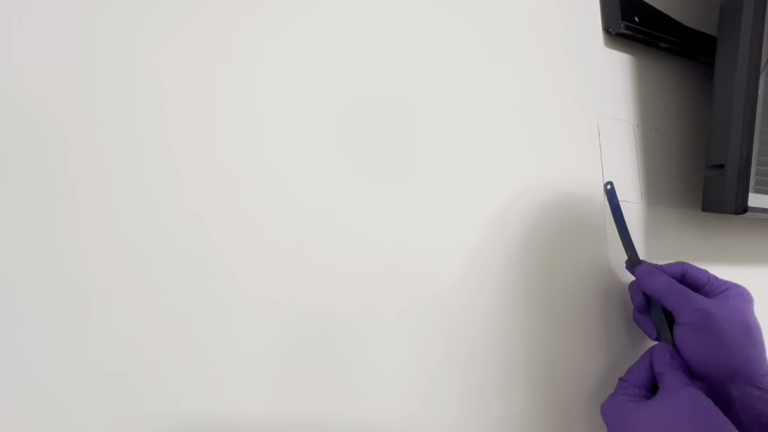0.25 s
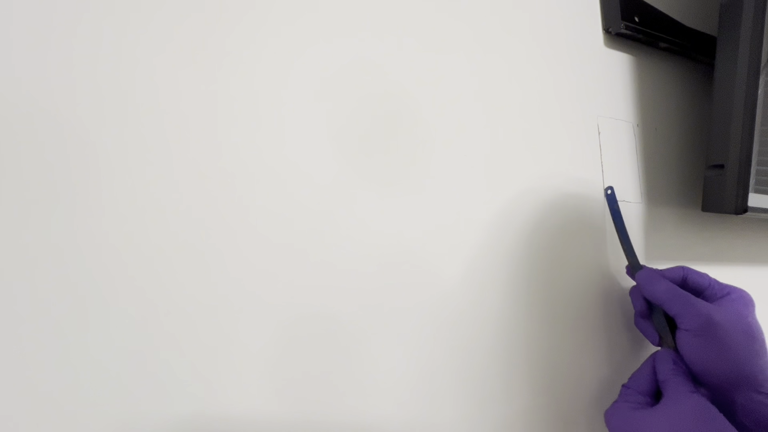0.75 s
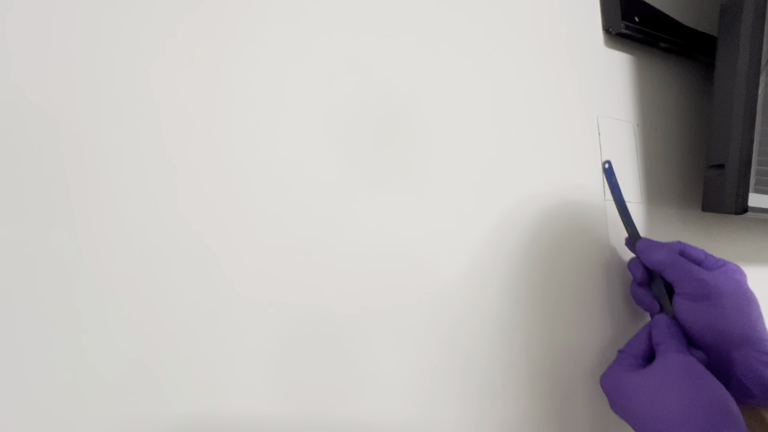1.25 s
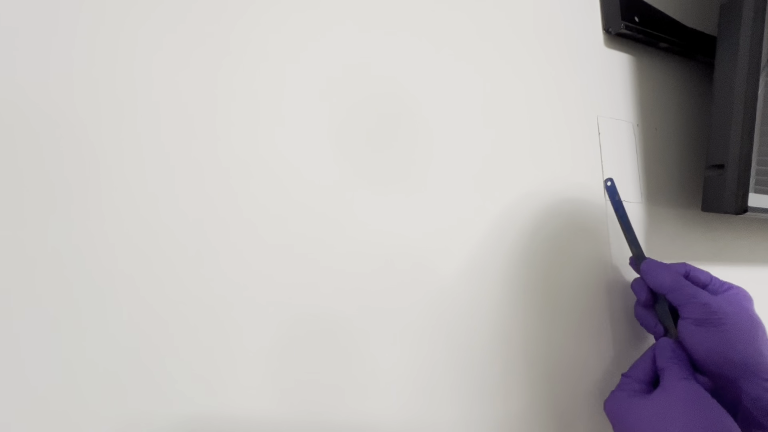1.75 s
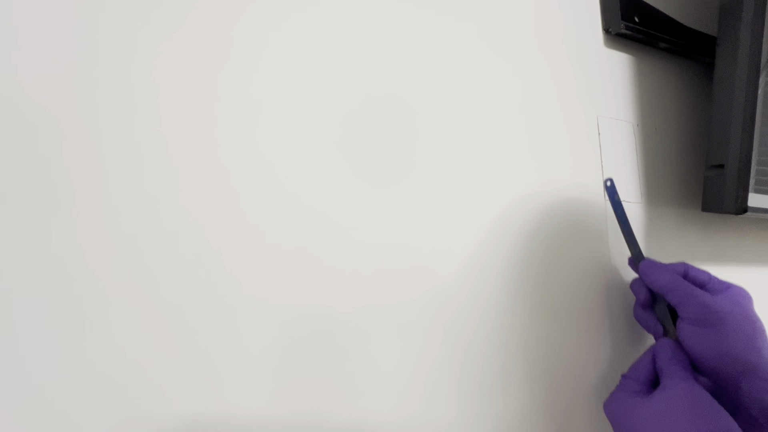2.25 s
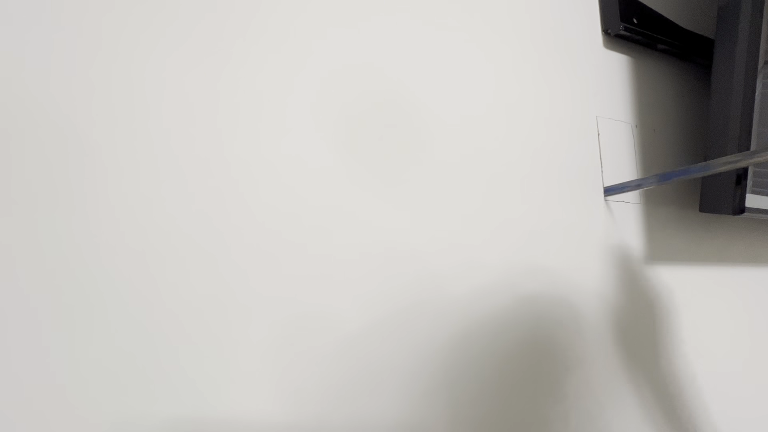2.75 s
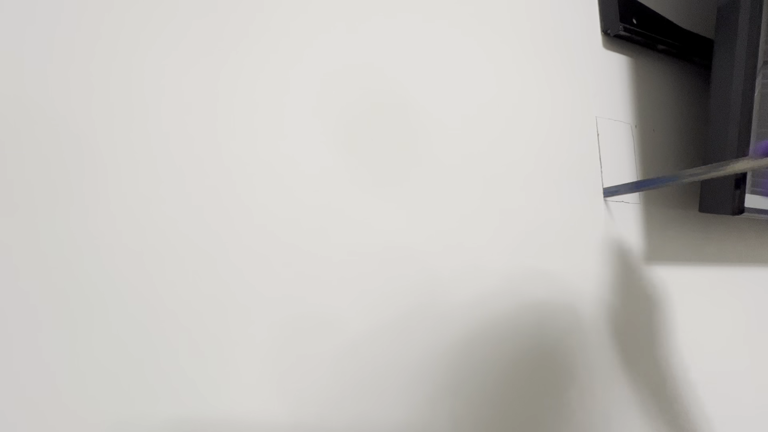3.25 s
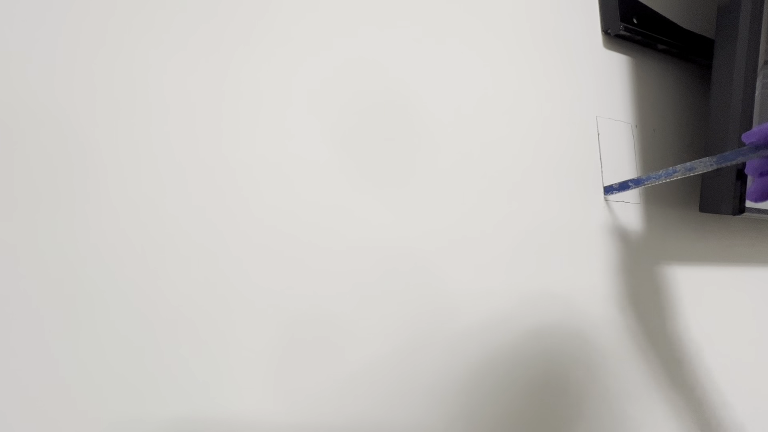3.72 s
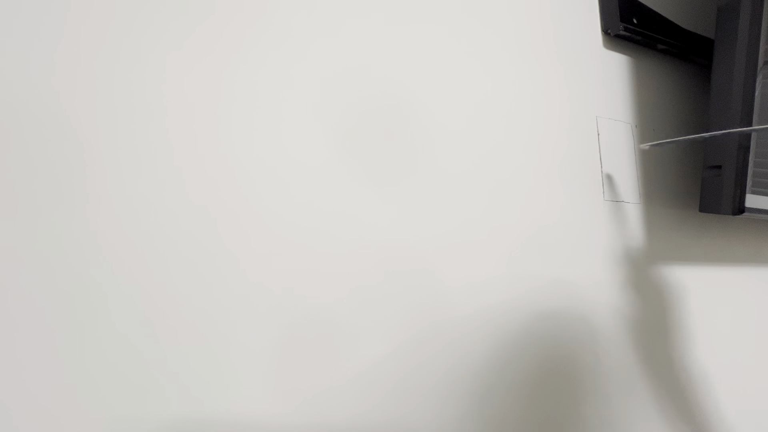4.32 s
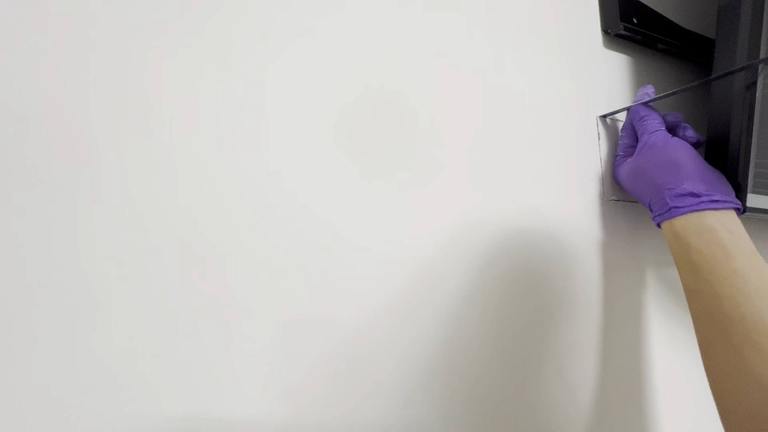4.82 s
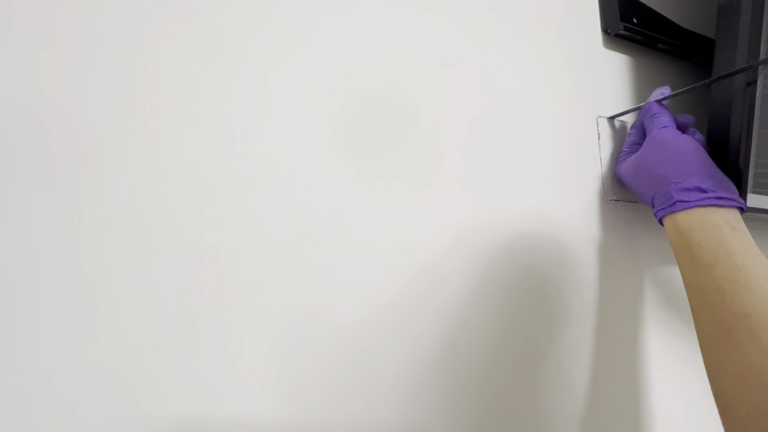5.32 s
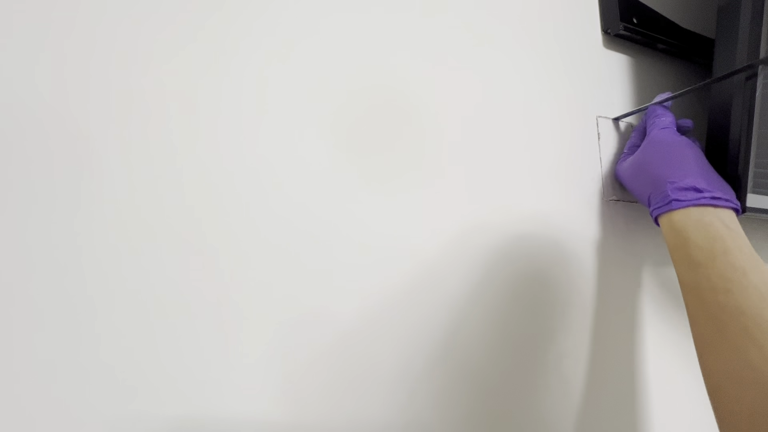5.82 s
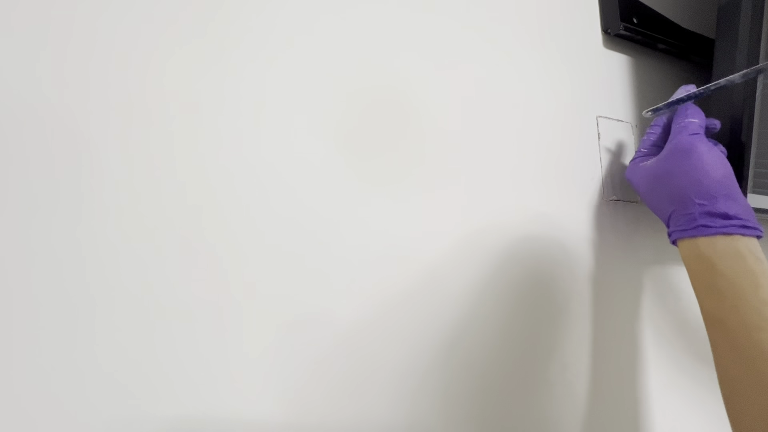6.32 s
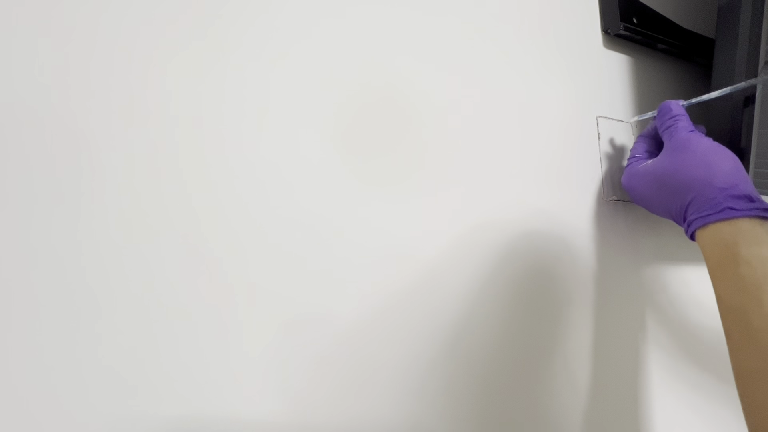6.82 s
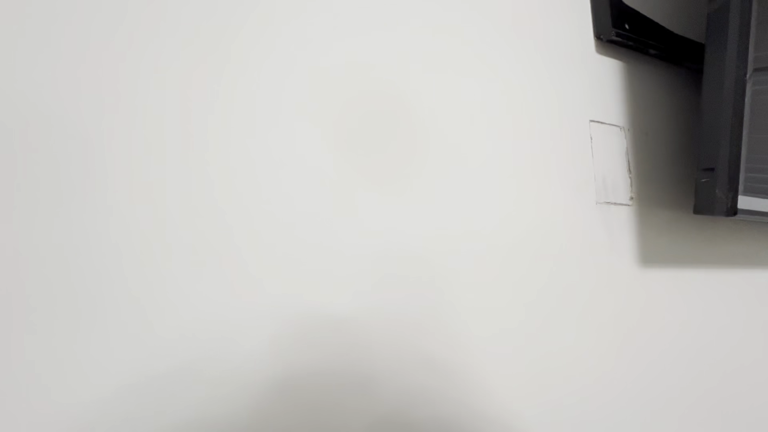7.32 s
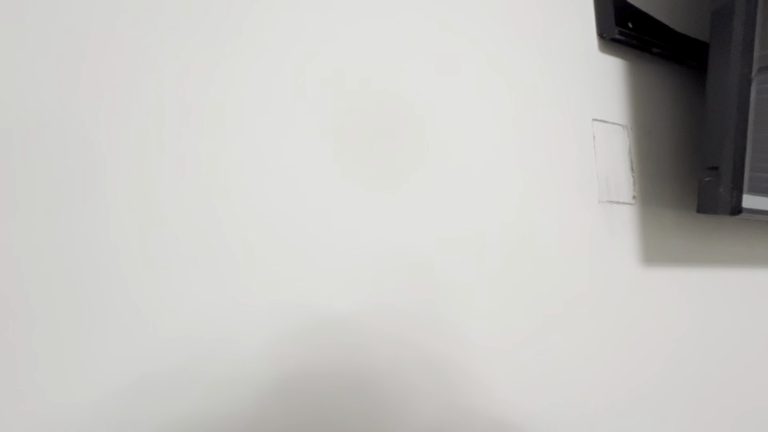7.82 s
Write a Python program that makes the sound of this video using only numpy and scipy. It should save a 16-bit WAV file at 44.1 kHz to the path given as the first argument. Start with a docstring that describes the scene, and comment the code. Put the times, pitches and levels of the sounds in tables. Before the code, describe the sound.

A thin saw rasps through hollow plasterboard, quiet, then harsh and quick, then muffled, before something snaps loudly and crumbs tick down.

```python
"""Sawing an opening in plasterboard

A thin hand-held saw blade works close to a two-port microphone, in five stretches of different tone.
Teeth crumble the gypsum (noisy impulses) and shake the hollow panel (resonances); fast strokes sing at the tooth rate.
At the end something snaps (a falling chirp) and knocks (ringing tones) near the left port, slides, and crumbs
tick down (short noise bursts). A steady hiss (coloured noise) sits mostly on the left."""
import sys
import numpy as np
from scipy import signal
from scipy.fft import rfft, irfft, next_fast_len
from scipy.io import wavfile
from scipy.ndimage import uniform_filter1d, map_coordinates

SR = 44100
rng = np.random.default_rng(int(sys.argv[2]) if len(sys.argv) > 2 else 0)


def digitize_waveform(pressure):
    """Quantize a signal to 16-bit integers and store it at the path in sys.argv[1].

    Rows of a 2-D input are taken as channels; values are limited to [-1, 1].
    """
    field = np.atleast_2d(pressure).T
    bounded = np.clip(field, -1, 1)
    quanta = np.round(bounded * 32767).astype(np.int16)
    wavfile.write(sys.argv[1], SR, quanta)


def volts(x):
    """Linear amplitude factor 10**(x/20) for a level x in dB, scalar or array-like."""
    e = np.asarray(x, float) / 20
    return 10 ** e


N = 355887


def unit(x):
    """Scales a signal to an rms of 1."""
    return x / np.sqrt(np.mean(x ** 2) + 1e-20)


def along(points, hz):
    """Reads a curve of (Hz, value) points, with straight lines on a log frequency axis."""
    point_hz, value = np.transpose(points)
    return np.interp(np.log(hz + 1), np.log(point_hz + 1), value)


def filtered(x, response):
    """Multiplies the spectrum of x by a complex response of frequency."""
    m = next_fast_len(x.shape[-1] + 8192)
    spectrum = rfft(x, m) * response(np.fft.rfftfreq(m, 1 / SR))
    return irfft(spectrum, m)[..., :x.shape[-1]]


def peaks(hz, table):
    """A flat response with resonances standing on it; each row: centre in Hz, width in Hz, height in dB."""
    response = 1
    for centre, width, db in table:
        ringing = 1j * hz * width / (centre * centre - hz * hz + 1j * hz * width)
        response = response + (volts(db) - 1) * ringing
    return response


def left_right(pan_db):
    """Splits a left-minus-right difference in dB evenly over the two ports."""
    return np.array([[pan_db], [-pan_db]]) / 2


def hiss():
    """Steady coloured noise, mostly on the left, with a low building hum made of narrow, wavering noise bands."""
    # Background noise, one list for the left port and one for the right.
    # Each row: frequency in Hz, level in dB per Hz before the hum is added.
    noise_colour = [
        [(30, -83.5), (120, -82.5), (300, -97.5), (450, -90.5), (650, -103), (1100, -99.0), (1500, -89.5),
         (2050, -84), (2800, -94.5), (4000, -106.0), (6700, -96.5), (8500, -108.0), (9800, -117.0),
         (16000, -139.0)],
        [(30, -91), (120, -100.0), (300, -106.0), (450, -102.0), (650, -104.0), (1100, -103.0), (1500, -101.0),
         (2050, -110.0), (2800, -116.0), (4000, -119.0), (6700, -115.0), (8500, -119.0), (9800, -123.0),
         (16000, -139.0)],
    ]
    # Low hum. Each row: frequency in Hz, width in Hz, height over the hiss in dB.
    hum = [(61.4, 8, 7), (133, 8.26, 1)]

    def density(hz):
        """Gain that gives white noise of rms 1 the wanted level per Hz."""
        colour = np.array([volts(along(port, hz)) for port in noise_colour])
        return colour * np.sqrt(SR / 2) * peaks(hz, hum)
    return filtered(rng.standard_normal((2, N)), density)


def ticks():
    """Crumbs landing: tiny bright noise bursts that die in a few milliseconds."""
    # Crumbs and small ticks. Each row: start in seconds, level in dB before colouring, left minus right in dB.
    crumbs = [(4.1114, -52, -2), (4.1278, -34, -14), (4.1414, -42, 2), (7.2654, -50, 0), (7.4334, -44, 4),
              (7.8894, -45, -13), (7.9044, -42.5, -6), (7.9469, -56, 3.0), (7.9693, -45, -8),
              (7.9863, -42, -13), (7.9994, -51, -4), (8.0124, -50, -6)]
    # Colour of a tick. Each row: frequency in Hz, gain in dB.
    tick_colour = [(1200, -21), (3000, -3.5), (6500, -0.5), (10000, -16.5), (16000, -31)]
    out, t = np.zeros((2, N + SR)), np.arange(SR // 50) / SR
    bursts = rng.standard_normal((len(crumbs), len(t))) * volts(-60 * t / 0.004)  # 60 dB down in 4 ms
    for (start, db, pan_db), burst in zip(crumbs, bursts):
        out[:, round(start * SR):][:, :len(t)] += volts(db + left_right(pan_db)) * burst
    return filtered(out[:, :N], lambda hz: volts(along(tick_colour, hz)))


def snap():
    """A bending wave: its highs outrun its lows, so the crack is a falling chirp, after a short one-sided step."""
    # The snap, one row for the left port and one for the right. Each row: start in seconds, peak in dB,
    # spread in seconds times root Hz, lag of the lows in cycles, echo delay in seconds, echo level in dB.
    arrivals = [(7.217, 0.5, 0.0477, 0.6215, 0.0023, -20), (7.2168, -1, 0.013, 1.2, .0024, -20)]
    # Colour of the snap at the left port. Each row: frequency in Hz, relative level in dB.
    left_colour = [(30, -1.5), (70, 15), (250, 17), (500, -8), (1000, 5.5), (2000, -9.5), (3500, -3),
                   (5200, 0), (7000, -10), (11000, -36), (16000, -52)]
    # Colour of the snap at the right port. Each row: frequency in Hz, relative level in dB.
    right_colour = [(30, -1.5), (60, 12.5), (200, 12), (500, -6), (1100, 7), (2200, -16), (4000, -36),
                    (8000, -21), (11000, -33), (16000, -42)]
    # A short step with noise on it; the snap is silent before the step starts.
    # One row: start in seconds, end in seconds, left level in dB, right level in dB.
    lead_in = (7.2128, 7.2172, -19, -34)
    cracks, pulse = [], np.zeros(N)
    pulse[0] = 1
    for (at, db, spread, cycles, echo_s, echo_db), colour in zip(arrivals, (left_colour, right_colour)):
        def path(hz):
            """Colour, growing delay towards the lows, and one echo."""
            turns = hz * at + 2 * spread * np.sqrt(hz) + cycles * np.log(hz + 20)
            echo = 1 + volts(echo_db) * np.exp(-2j * np.pi * hz * echo_s)
            return volts(along(colour, hz)) * np.exp(-2j * np.pi * turns) * echo
        crack = filtered(pulse, path)
        cracks.append(volts(db) * crack / np.abs(crack).max())
    start, end, *step_db = lead_in
    t = np.arange(N) / SR
    ripple = uniform_filter1d(rng.standard_normal((2, N)), size=16, axis=1)
    step = ((t > start) & (t < end)) * (1 + 0.5 * ripple)
    return np.array(cracks) * (t > start) + volts(np.array(step_db))[:, None] * step


def knocks():
    """Each blow rings the panel's low tones at new strengths; harder blows favour the higher tones."""
    # Blows on the panel. Each row: start in seconds, level in dB before a common cut,
    # left minus right in dB, hardness in dB per octave above 200 Hz.
    blows = [(1.13, -39, 8.0, 4), (2.453, -20, 6, 12), (3.584, -19, 6, 0), (3.791, -22, -7, 13),
             (4.459, -32, 11, 4), (5.754, -25.5, -4, 17), (5.876, -12.5, -3, 9), (7.233, -5.5, 15.5, 2.5),
             (7.331, -20, 2, -4), (7.376, -13, -8, -10), (7.381, -13, 20, -2), (7.392, -7, 21, 2.5)]
    # Low panel tones. Each row: frequency in Hz, level in dB, time to fall 60 dB in seconds.
    tones = [(54, -16, 0.1), (137, -3, 0.025), (190.7, -8.5, 0.13), (245, -5, 0.067), (304, -5, 0.071),
             (475, -26, 0.053)]
    out, t = np.zeros((2, N + SR)), np.arange(SR // 3) / SR
    luck_db = rng.normal(0, 0.48, (len(blows), len(tones)))
    for (start, db, pan_db, hard_db), luck_row in zip(blows, luck_db):
        ring = np.zeros(len(t))
        for (hz, tone_db, t60), luck in zip(tones, luck_row):
            level = tone_db + luck + hard_db * np.log2(hz / 200)
            ring += volts(level - 60 * t / t60) * np.sin(2 * np.pi * hz * t)
        soft_start = 1 - np.exp(-t / 0.0032)
        out[:, round(start * SR):][:, :len(t)] += volts(db - 7.5 + left_right(pan_db)) * ring * soft_start
    return out[:, :N]


def crumble(n, per_s, spread_db):
    """Gypsum breaking: random impulses of very uneven size."""
    hit = rng.random((2, n)) < per_s / SR
    size = volts(spread_db * rng.exponential(size=(2, n)))
    return unit(hit * rng.standard_normal((2, n)) * size)


def teeth(t, jitter, scatter_db):
    """One push per tooth passing the board, and its share of the force; both follow blade speed."""
    # Fast strokes. Each row: fastest moment in seconds, top rate in teeth per second,
    # top share of regular tooth pulses from 0 to 1.
    fast_strokes = [(2.575, 520, 0.1), (2.755, 445, 0.13), (2.92, 737, 0.2), (3.065, 600, 0.4),
                    (3.235, 782, 0.4), (3.385, 450, 0.1)]
    turn_hz, half_stroke_s = 278.5, 0.08  # tooth rate where the blade turns; time from turn to full speed
    fastest, top, clean = np.transpose(fast_strokes)[:, :, None]
    speed = np.cos(np.pi / 2 * np.clip((t - fastest) / half_stroke_s, -1, 1)) ** 1.5
    rate = turn_hz + ((top - turn_hz) * speed).max(0)
    slack = unit(uniform_filter1d(rng.standard_normal(len(t)), size=200))
    passed = np.floor(np.cumsum(rate) / SR + jitter * slack)
    push = (np.diff(passed, prepend=0) > 0) * volts(scatter_db * rng.standard_normal(len(t)))
    push = uniform_filter1d(push.astype(float), size=11)  # a tooth pushes softly: strong fundamental
    share = np.clip((clean * speed ** 1.6).max(0), 0, 1)
    return unit(push - uniform_filter1d(push, size=200)), share


def panel(hz, blade):
    """Panel and blade ring together."""
    # Panel and blade resonances. Each row: frequency in Hz, width in Hz, height over the broad colour in dB.
    resonances = [(78.4, 24, 6.5), (141.3, 7.5, 12), (175, 130, 6), (250.3, 19.3, 7.5), (343.4, 21, 6),
                  (456.3, 22, 7.5), (560, 3.9, 7), (630.6, 3.9, 8.5), (713, 15, 6), (769, 4.3, 6),
                  (854, 25, 7), (910, 39, 8.5), (1067, 22, 5), (1398, 58, 6), (1515, 22, -4),
                  (1647, 14, 7.5), (1778, 19.6, 2), (2247, 40, 1), (2447, 45, 6), (2697, 200, 5),
                  (3024, 14, 4)]
    return peaks(hz, resonances + blade)


def ports(pair, sides, t60):
    """Mixes two signals to partly alike left and right, the left one later, each with its own short tail."""
    # Likeness of left and right. Each row: frequency in Hz, likeness from 0 to 1.
    alike = [(60, .9), (250, .65), (1500, .75), (6000, .65), (14000, .9)]
    # Panel and room tail. Each row: frequency in Hz, level against the direct sound in dB.
    wet = [(60, -10.5), (250, 0), (600, 6.5), (1000, 2.5), (2500, 3), (9000, 11.5)]
    left_lag = 12  # samples

    def blend(hz):
        """Shares of the common and the opposed signal that give the wanted likeness."""
        turn = np.arccos(along(alike, hz)) / 2
        return np.array([np.cos(turn), np.sin(turn)])
    mid, side = filtered(pair, blend)
    tail_t = np.arange(SR // 5) / SR
    tail = rng.standard_normal((2, len(tail_t))) * volts(-60 * tail_t / t60)

    def path(hz):
        """Direct sound plus tail: fine peaks and dips, even on the broad scale."""
        tail_spectrum = rfft(tail, 2 * len(hz) - 1) / np.linalg.norm(tail[0])
        both = 1 + volts(along(wet, hz)) * tail_spectrum
        broad_power = uniform_filter1d(np.abs(both) ** 2, size=round(250 / hz[1]), axis=1)  # over 250 Hz
        lean = volts(along(sides, hz) / 2)
        left = lean * np.exp(-2j * np.pi * hz * left_lag / SR)
        return both / np.sqrt(broad_power) * np.array([left, 1 / lean])
    return filtered(np.array([mid + side, mid - side]), path)


def wobble(t):
    """A smooth random gain: random dB values 14 times a second, joined by a curve."""
    at = (t - t[0]) * 14
    return volts(3.5 * map_coordinates(rng.standard_normal(len(t) // 500 + 4), [at]))


def effort(t, manner):
    """Gains of bite, panel swing and grit: the strokes add in power over a wavering rest."""
    # Saw strokes, then the slide after the snap. Each row: bite peak in seconds, rise in seconds,
    # fall in seconds before stretching, bite level in dB, grit level in dB.
    strokes = [(.025, 0.035, 0.077, -55, -59.5), (.18, 0.076, 0.049, -51, -61.5),
               (.308, 0.095, 0.049, -57, -61.5), (.426, 0.043, 0.057, -51, -61.5),
               (.556, 0.06, .05, -55.5, -62.5), (.69, .05, 0.067, -55, -63.5), (.83, 0.043, .08, -63, -79),
               (.96, 0.033, 0.08, -50, -61.5), (1.094, 0.057, 0.068, -56.5, -63.5),
               (1.25, 0.067, 0.072, -51, -56.5), (1.37, 0.036, 0.066, -64, -64),
               (1.436, 0.039, 0.062, -56.5, -57.5), (1.56, 0.044, 0.088, -48.5, -53.5),
               (1.71, 0.083, 0.085, -53.5, -56), (1.835, 0.048, 0.096, -47, -52),
               (1.96, 0.057, 0.095, -52.5, -54), (2.125, 0.061, 0.059, -46, -54),
               (2.28, 0.084, 0.044, -53.5, -56.5), (2.384, 0.051, .1, -46.5, -54),
               (2.455, .003, 0.039, -28, -50.5), (2.564, 0.036, 0.094, -24.5, -38.5),
               (2.721, 0.052, 0.09, -27.5, -40.5), (2.899, 0.025, 0.077, -21, -32.5),
               (3.058, 0.078, 0.083, -27.5, -39), (3.228, 0.032, 0.081, -24, -34.5),
               (3.372, 0.076, 0.094, -26.5, -41), (3.593, 0.0114, 0.08, -36.5, -46),
               (3.797, 0.019, 0.062, -38.5, -49), (4.466, 0.0057, 0.066, -53.5, -54.5),
               (4.542, 0.089, 0.056, -42, -53.5), (4.65, 0.075, 0.096, -50, -54),
               (4.789, 0.067, 0.21, -44.5, -51.5), (5.17, 0.079, 0.082, -48, -51),
               (5.31, 0.081, 0.1, -42.5, -52), (5.468, 0.11, 0.054, -54.5, -60),
               (5.568, 0.053, 0.075, -47.5, -56), (5.76, 0.053, 0.052, -47.5, -53.5),
               (5.82, 0.015, .04, -48.5, -49), (5.88, .04, 0.11, -40, -45.5),
               (6.49, 0.032, 0.063, -82, -63.5), (7.384, 0.03, 0.039, -47, -57.5),
               (7.471, 0.1, 0.14, -47, -51.5), (7.545, 0.083, .04, -52, -51.5),
               (7.786, 0.012, 0.015, -67.5, -67)]
    # The panel's lows under hand and blade, between strokes. Each row: time in seconds, level in dB before wavering.
    lean = [(0, -62), (.46, -46), (.55, -54), (.8, -58), (1.15, -49), (1.3, -48.5), (1.5, -58), (2.44, -60),
            (2.46, -38.5), (2.54, -26), (2.66, -32), (2.85, -43), (3.45, -34), (3.47, -67), (3.55, -69),
            (3.75, -58), (3.9, -42.5), (4.07, -66.5), (4.45, -60), (4.47, -40), (4.7, -51), (4.91, -36.5),
            (5.1, -84), (5.62, -36.5), (5.7, -51), (5.82, -45), (6.05, -51.5), (6.18, -54), (6.22, -62.5),
            (6.44, -64), (6.62, -61), (6.8, -74), (7.2, -77.5), (7.28, -31), (7.36, -39.5), (7.396, -22),
            (7.43, -40), (7.48, -33), (7.5, -44), (7.6, -54), (7.67, -53), (7.7, -42), (7.76, -43),
            (7.82, -52), (8.07, -43.5)]
    bite_rest_db, grit_rest_db, swing_db, round_in, round_out = manner
    here = [row for row in strokes if t[0] <= row[0] <= t[-1]]
    peak_s, rise, fall, bite_db, grit_db = np.transpose(here)[:, :, None]

    def swell(db, lag_s, stretch, rest):
        """One layer's gain; a stroke is 12 dB down at the ends of its rise and stretched fall."""
        dt = t - peak_s - lag_s
        rising = np.abs(dt / rise) ** round_in
        falling = np.abs(dt / fall / stretch) ** round_out
        away = np.where(dt < 0, rising, falling)
        return np.sqrt((volts(db - 12 * away) ** 2).sum(0) + (rest * wobble(t)) ** 2)
    bite = swell(bite_db, 0, 0.85, volts(bite_rest_db))
    # the panel answers late and swings on
    swing = swell(bite_db + swing_db, 0.011, 1.07, volts(np.interp(t, *np.transpose(lean))))
    grit = swell(grit_db, 0.0052, 0.73, volts(grit_rest_db))  # grit peaks after the bite
    return bite, swing, grit


def saw():
    """In each stretch the cutting force passes through the panel and is heard as swing, bite and grit."""
    # The five stretches of work. Each row: start in seconds, end in seconds.
    stretches = [(0, 2.452), (2.452, 3.457), (3.457, 4.457), (4.457, 7.213), (7.213, 8.07)]
    # Colour of the work, one list per stretch. Each row: frequency in Hz, relative level in dB.
    colours = [
        [(18, -43), (30, -5), (59, 7), (106, -5.5), (138, 3), (287, -10.5), (355, -4.5), (569, -17.5),
         (632, -15), (822, -27), (2750, -25), (4910, -35), (8740, -41.5), (16000, -118)],
        [(18, -54.5), (30, -23.5), (79, -4.5), (328, -5.5), (384, -2), (702, -10.5), (1280, -16.5),
         (1460, -15.5), (1860, -20.5), (8520, -31.5), (13700, -62.5), (16000, -59.5)],
        [(18, -44), (30, -9), (75, 3.5), (295, -6.5), (345, -5), (512, -16.5), (616, -10.5), (988, -31.5),
         (1630, -30), (3580, -41), (8520, -42), (16000, -92)],
        [(18, -39), (30, -0.5), (71, 9.5), (109, -3), (345, -4.5), (394, -13.5), (512, -16), (740, -29.5),
         (1320, -25), (4650, -37.5), (6900, -34.5), (16000, -75)],
        [(18, -29), (30, 0.5), (59, 8.5), (215, -15), (252, -8.5), (473, -23), (1720, -34.5), (4530, -52.5),
         (6720, -42), (11100, -60), (12300, -78), (16000, -67.5)],
    ]
    # Balance of the ports, one list per stretch. Each row: frequency in Hz, left minus right in dB.
    balances = [
        [(60, 9.5), (180, 2), (550, 3), (1650, 3.5), (4970, -4.5), (15000, -7.5)],
        [(60, 4.5), (180, 2.5), (550, 0), (1650, 2), (4970, -2), (15000, -3.5)],
        [(60, 5.5), (180, 7), (550, 5), (1650, 3), (4970, -3.5), (15000, -2.5)],
        [(60, 3), (180, 5), (550, 1), (1650, 3), (4970, -4), (15000, -2)],
        [(60, 9.5), (120, 23.5), (240, 16.5), (480, 17), (950, 0.5), (1890, 15.5), (3770, 12.5), (7520, 10),
         (15000, -4)],
    ]
    # The free length of blade rings differently in each stretch, one list per stretch.
    # Each row: frequency in Hz, width in Hz, height over the broad colour in dB.
    blades = [
        [(3940, 49, 7.5), (6440, 950, 8.5), (8790, 330, 15.5)],
        [(4070, 120, 3)],
        [(3840, 71, 7), (6340, 140, 8.5), (8440, 150, 12)],
        [(6700, 230, -0.5), (8900, 1300, 7.5)],
        [(970, 310, 9), (2310, 290, -19), (6750, 480, 0.5)],
    ]
    # Way of working, one row per stretch. Each row: bite between strokes in dB, grit between strokes in dB,
    # panel swing over bite in dB, roundness of the rise, roundness of the fall (both exponents).
    manners = [(-77, -76, 3.5, 2.07, 1.8), (-44.5, -59.5, -3.5, 1.6, 1.4), (-86, -77.5, 6, 1.45, 1.04),
               (-80.5, -82, 6, 1.94, 1.53), (-75.5, -70.5, 5, 0.97, 2.28)]
    # Teeth catch and tear a lump loose. Each row: time in seconds, sudden level change in dB,
    # seconds until about a third of that change is left.
    catches = [(1.521, 7.5, 0.017), (2.531, 1.5, .01), (2.552, 4.5, .011), (2.876, 2.5, 0.0096),
               (3.199, 3.5, .009), (3.217, 4.5, 0.0075), (3.59, 4, 0.0072), (3.791, 2.5, 0.019),
               (4.458, -2.5, 0.017), (5.54, 7, 0.0056), (5.859, 3, 0.012), (5.877, 6.5, .015)]
    out = np.zeros((2, N))
    for (start, end), colour, sides, blade, manner in zip(stretches, colours, balances, blades, manners):
        a, b = round(start * SR), min(round(end * SR), N)
        t = np.arange(a, b) / SR
        push, share = teeth(t, jitter=0.1, scatter_db=4)
        crumbling = np.sqrt(1 - share) * crumble(b - a, per_s=5000, spread_db=2)
        force = crumbling + np.sqrt(share) * push * [[1.3], [0.4]]
        board = filtered(force, lambda hz: volts(along(colour, hz)) * panel(hz, blade))

        # blade and hand move, so the path to the ports keeps changing
        drift = 2 * np.pi * 1.1 * t
        heard = np.abs(np.cos(drift)) * ports(board, sides, t60=0.06)
        heard += np.abs(np.sin(drift)) * ports(board, sides, t60=0.084)

        def split(hz):
            """Middle, low and high bands, for bite, swing and grit."""
            low = 1 / (1 + (hz / 450) ** 6)
            high = 1 - 1 / (1 + (hz / 1500) ** 6)
            return np.array([1 - low - high, low, high])[:, None]
        parts = filtered(heard, split)
        catch_db = sum(change_db * (t > at) * np.exp(-np.abs(t - at) / life) for at, change_db, life in catches)
        # catches leave the swing alone; regular teeth lower it most (dB at a full share)
        for part, gain, caught, drop_db in zip(parts, effort(t, manner), (1, 0, 1), (3.5, 10.5, 3.5)):
            level = gain * volts(caught * catch_db - drop_db * share)
            out[:, a:b] += part / np.std(part.mean(0)) * level
    return out


def scene():
    """All sources added at the two ports."""
    return hiss() + ticks() + snap() + knocks() + saw()


def roll_off(x):
    """The treble ends steeply here."""
    return signal.sosfilt(signal.butter(12, 16460, fs=SR, output="sos"), x)


def record(dry):
    """A soft clip rounds off the loudest peaks near a ceiling of 0.9."""
    mix = dry / (1 + np.abs(dry / 0.9) ** 6) ** (1 / 6)
    return roll_off(mix)


dry = scene()
out = record(dry)
digitize_waveform(out)
```